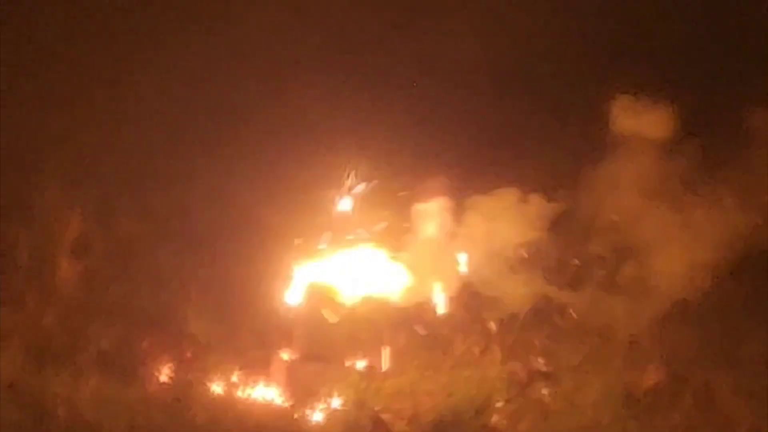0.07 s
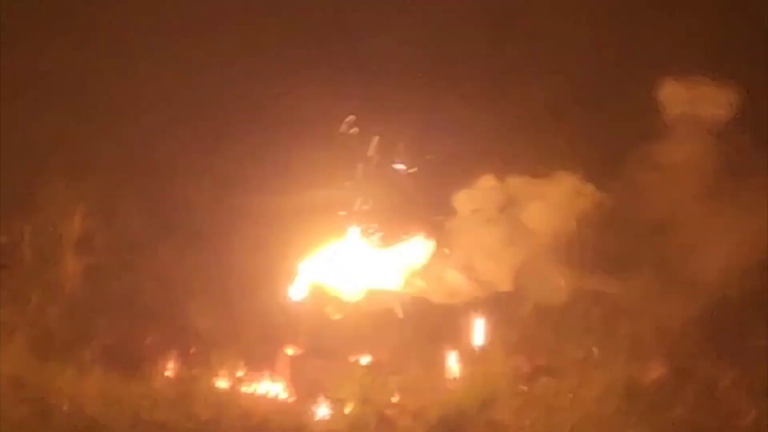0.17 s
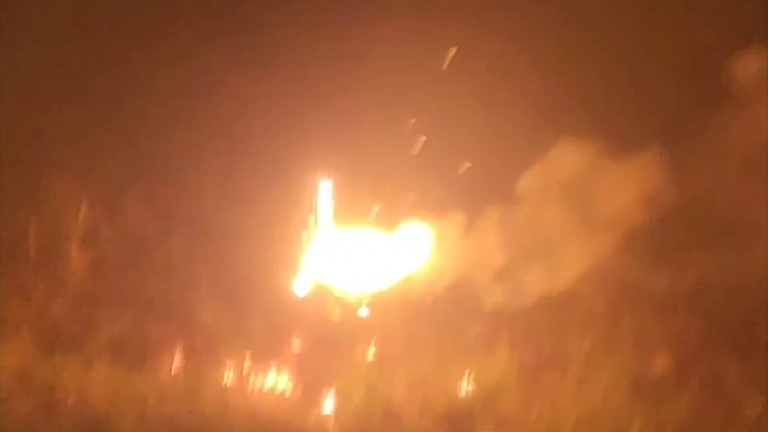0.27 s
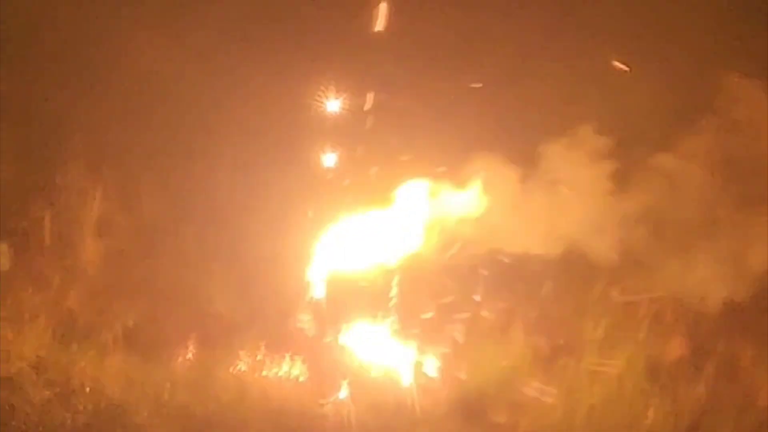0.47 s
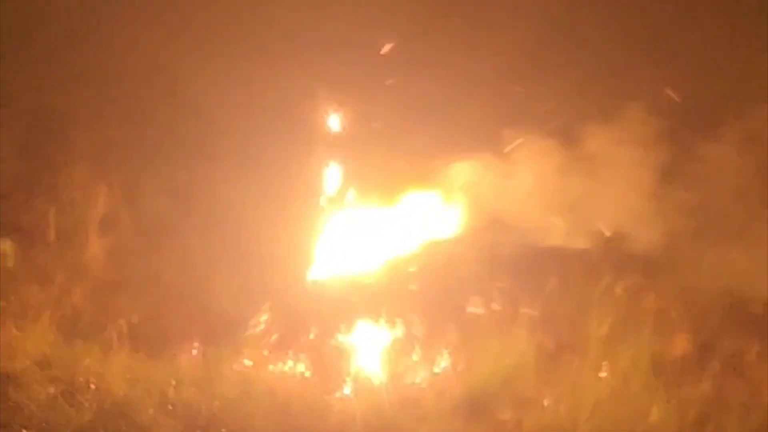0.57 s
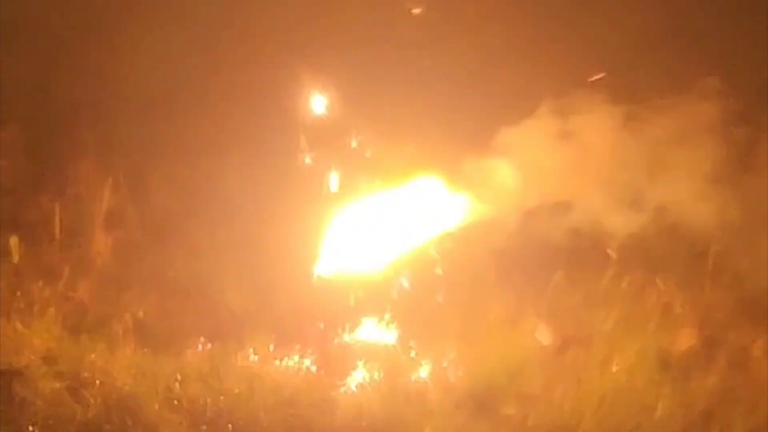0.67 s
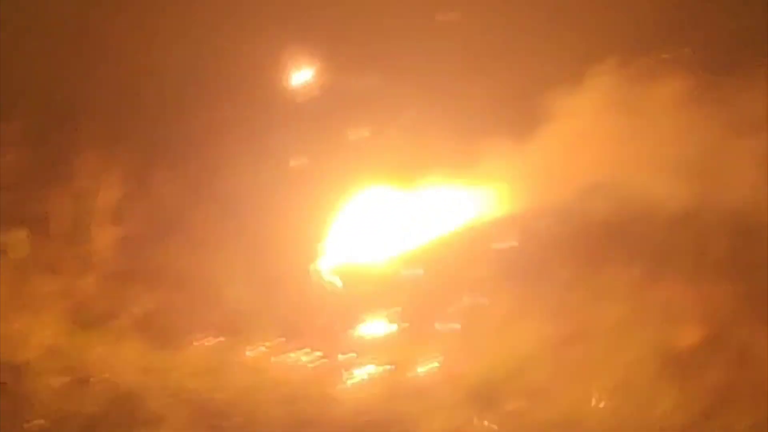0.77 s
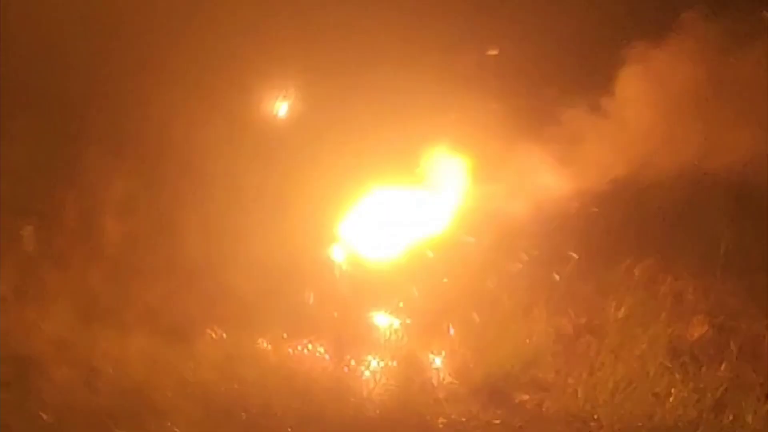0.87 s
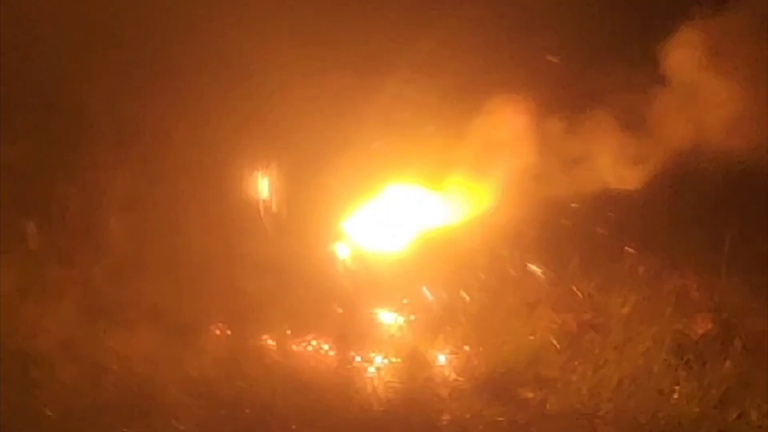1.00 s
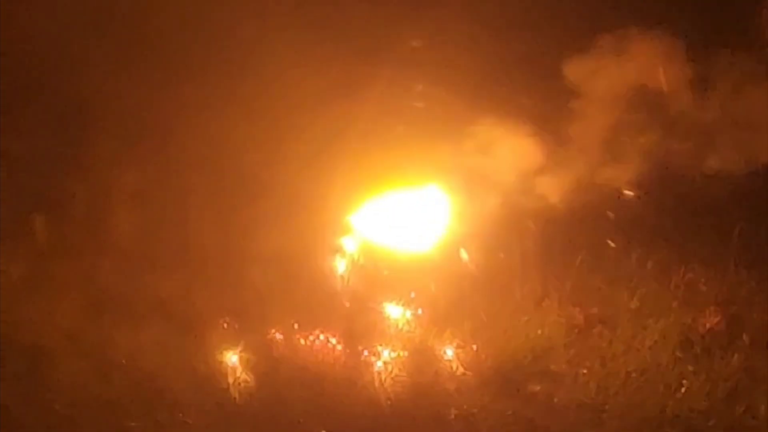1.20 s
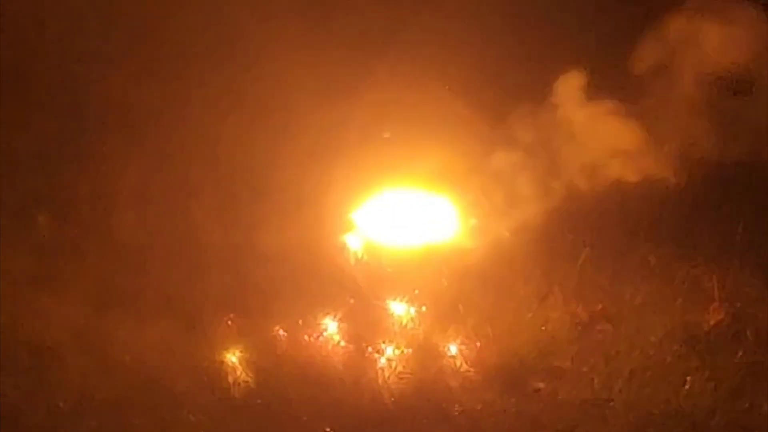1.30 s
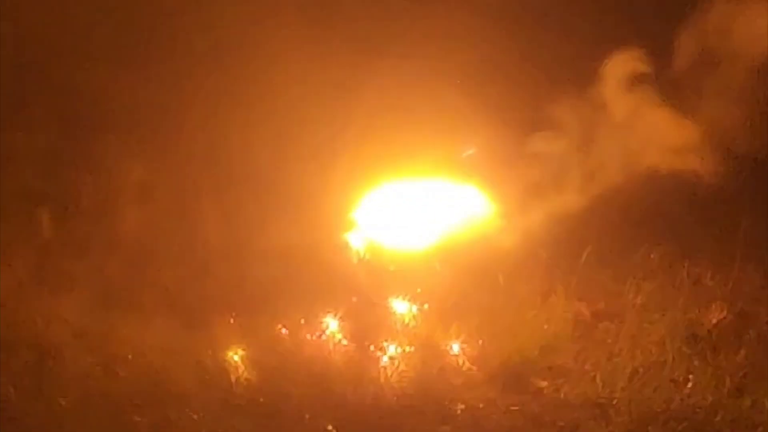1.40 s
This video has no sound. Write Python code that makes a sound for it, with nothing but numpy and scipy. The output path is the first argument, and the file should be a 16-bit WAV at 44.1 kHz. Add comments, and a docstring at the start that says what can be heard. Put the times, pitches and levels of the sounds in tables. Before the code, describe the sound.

A surging hiss and roar of burning thermite, outdoors a few metres off, with low rumble and faint crackle. A small pop comes, then a loud thumping pop, then a sharper, weaker one, among brief spits and soft puffs.

```python
"""Open ground at night, with thermite burning a few metres away.
The jet of flame hisses and roars in surges over a fluttering rumble, while sparks crackle faintly.
The melt spits, and three gas pockets pop out of it, the middle one much the loudest.
Soft puffs of gas thump around them. Grass and bushes scatter the pops and spits back."""
import sys
import numpy as np
from scipy import signal
from scipy.io import wavfile
from scipy.ndimage import uniform_filter1d

SR = 44100
rng = np.random.default_rng(int(sys.argv[2]) if len(sys.argv) > 2 else 0)


def generate_wav(signal):
    """Clip the signal to [-1, 1] and save it as 16-bit WAV at the path in sys.argv[1]."""
    frames = np.transpose(np.atleast_2d(signal))
    scaled = np.clip(frames, -1, 1) * 32767
    pcm = np.round(scaled).astype(np.int16)
    wavfile.write(sys.argv[1], SR, pcm)


N = 63945

# how strongly the thermite burns (time [s], relative level [dB])
BURN_STRENGTH = [(0, -66.5), (0.12, -63.5), (0.19, -67), (0.235, -65), (0.37, -66.5), (0.426, -64.5),
                 (0.49, -67.5), (0.55, -63.9), (0.62, -65.5), (0.7, -66.6), (0.753, -61), (0.87, -63),
                 (0.94, -63.5), (0.97, -61), (1.07, -67.5), (1.2, -67.5), (1.3, -68.7), (1.45, -67)]
# tone of the hiss and the sparks (frequency [Hz], relative level [dB])
HISS_TONE = [(500, -29), (1300, -2), (2400, 6), (3500, 4.5), (5300, -3.5), (7400, -2.5), (9500, -16.5),
             (12000, -27.5), (16000, -38)]


def amp(db):
    """Turns decibels into a gain."""
    return 10 ** (np.asarray(db) / 20)


def unit(x):
    """Scales a signal to an average power of 1."""
    return x / np.sqrt(np.mean(x ** 2) + 1e-20)


def read(points, hz):
    """Looks up a table by frequency, on a log scale."""
    f, value = np.transpose(points)
    return np.interp(np.log(hz + 1), np.log(f + 1), value)


def swing(curve, t):
    """How many dB a level curve lies above the average of its points."""
    s, db = np.transpose(curve)
    return np.interp(t, s, db - db.mean())


def pan(db):
    """Left and right gains; positive dB makes the left louder."""
    return amp(np.array([[db], [-db]]) / 2)


def add(mix, start_s, sound):
    """Mixes a sound in at a given time."""
    part = mix[:, max(round(start_s * SR), 0):][:, :sound.shape[-1]]
    part += sound[..., :part.shape[1]]


def impulse(tone, size=4096):
    """A click with the given tone, also usable as a filter."""
    log_gain = np.log(amp(read(tone, abs(np.fft.fftfreq(size, 1 / SR)))))
    spectrum = np.exp(np.conj(signal.hilbert(log_gain)))  # packs the energy at the start
    return np.fft.ifft(spectrum).real[:size // 2]


def convolve(x, response):
    """Filters each channel and keeps its length."""
    return signal.fftconvolve(np.atleast_2d(x), np.atleast_2d(response), axes=1)[:, :x.shape[-1]]


def turbulence(tone, curve, patchy_db, flicker_db, size):
    """Swirling gas: stereo noise that follows a level curve, with random patches and flicker."""
    # how alike the two sides are (frequency [Hz], likeness [-1 to 1])
    likeness = [(60, 0.97), (130, 0.85), (300, 0.75), (650, 0.76), (1400, -0.45), (2500, 0.18),
                (16000, .05)]
    hop = size // 4
    t = np.arange(N // hop + 6) * hop / SR
    hz = np.fft.rfftfreq(size, 1 / SR)
    a, b, c, d, patches = rng.standard_normal((5, len(t), len(hz)))
    patches = uniform_filter1d(patches, size=10, axis=0)  # smooth over time
    patches = unit(uniform_filter1d(patches, size=7, axis=1))  # and over frequency
    flicker = unit(uniform_filter1d(rng.standard_normal(len(t)), size=3))[:, None]
    same = np.clip(read(likeness, hz), -1, 1)
    left = a + 1j * b
    right = same * left + np.sqrt(1 - same ** 2) * (c + 1j * d)
    level_db = read(tone, hz) + swing(curve, t)[:, None] + patchy_db * patches + flicker_db * flicker
    spectra = np.array([left, right]) * amp(level_db)
    _, noise = signal.istft(spectra.transpose(0, 2, 1), nperseg=size, noverlap=size - hop)
    return unit(noise[:, :N])


def scatter(sound):
    """The ground, grass and bushes throw back a short, blurred echo."""
    # how long the echo lasts (frequency [Hz], time to fade by 60 dB [s])
    fade_times = [(100, 0.12), (600, 0.093), (2000, 0.073), (10000, 0.12)]
    hz, t, noise = signal.stft(rng.standard_normal((2, SR // 2)), SR, nperseg=256)
    fade = amp(-60 * t / read(fade_times, hz)[:, None])
    _, tail = signal.istft(noise * fade, SR, nperseg=256)
    return amp(-13) * convolve(sound, tail / np.linalg.norm(tail[0]))


def rumble():
    """Flame and wind make a low flutter."""
    # tone of the rumble (frequency [Hz], relative level [dB])
    tone = [(15, -8), (30, -18), (55, 3.5), (85, 1.5), (125, -6), (180, -12.5), (260, -16.5), (450, -30.5),
            (1200, -97)]
    # its rise and fall (time [s], relative level [dB])
    flutter = [(0, -44), (0.099, -45.5), (0.27, -40), (0.33, -45), (0.48, -45.5), (0.6, -42.5), (0.72, -46),
               (0.84, -46), (0.928, -43), (1.07, -49.5), (1.14, -44), (1.22, -50.5), (1.45, -44)]
    return amp(-42.5) * turbulence(tone, flutter, patchy_db=0.03, flicker_db=0, size=2048)


def sparks(usual_per_s=260, spread_db=4):
    """Sparks make tiny ticks of random size, more of them while the burn is strong."""
    per_s = usual_per_s * amp(swing(BURN_STRENGTH, np.arange(N) / SR))
    ticks = (rng.random(N) < per_s / SR) * rng.choice([-1, 1], N)
    sizes = amp(spread_db * np.minimum(rng.exponential(1, N), 4))
    sides = rng.uniform(0.24, 1, (2, N))
    return amp(-80) * unit(convolve(ticks * sizes * sides, impulse(HISS_TONE)))


def puffs(width_cycles=0.38):
    """Each puff of gas is one rounded swell of pressure with a dip on either side."""
    # soft puffs (time [s], level [dB], pitch [Hz], left over right [dB])
    gas_puffs = [(0.232, -42, 123, -29), (0.254, -35.5, 80.5, -7), (0.278, -33.5, 101, -15),
                 (.289, -38.5, 134, -23), (0.4427, -31, 149, -14), (.634, -43, 161, -26.5),
                 (.679, -30, 114, -5), (0.69, -34, 119, -2), (.932, -35.5, 70, -28.5),
                 (0.99, -38.5, 130, 5)]
    out = np.zeros((2, N))
    for s, db, hz, pan_db in gas_puffs:
        cycles = (np.arange(N) / SR - s) * hz
        swell = np.exp(-0.5 * (cycles / width_cycles) ** 2)
        out += amp(db) * pan(pan_db) * swell * np.cos(2 * np.pi * cycles)
    return out


def flame():
    """The jet of flame surges with a fine fizz, a hiss and a roar; the fizz swings widest."""
    # tones of the fizz and the roar (frequency [Hz], relative level [dB])
    fizz_tone = [(3000, -18), (6000, 0.5), (8000, -1.5), (11500, -4.5), (16000, -4)]
    roar_tone = [(80, -2), (200, 2), (330, -3), (520, 0), (800, -4), (1100, -9.5), (1700, -12), (2300, -18),
                 (5000, -39.5)]
    # their surges (time [s], relative level [dB])
    fizz_surges = [(0, -85), (0.12, -78.5), (0.19, -87), (0.235, -83), (0.37, -82), (0.41, -75),
                   (0.44, -73.5), (0.49, -95), (0.55, -76.5), (0.61, -82.5), (0.7, -87), (0.755, -75),
                   (0.87, -78), (0.97, -71.5), (1.079, -89.5), (1.45, -90)]
    roar_surges = [(0, -56), (0.12, -53.0), (0.36, -55.5), (0.43, -51), (0.49, -54), (0.65, -55.5),
                   (0.84, -54.5), (0.961, -50.5), (1.08, -56), (1.22, -58), (1.45, -56.5)]
    fizz = turbulence(fizz_tone, fizz_surges, patchy_db=1.4, flicker_db=1, size=256)
    hiss = turbulence(HISS_TONE, BURN_STRENGTH, patchy_db=0.9, flicker_db=0.85, size=256)
    roar = turbulence(roar_tone, roar_surges, patchy_db=1.5, flicker_db=0.28, size=512)
    return amp(-66.5) * fizz + amp(-62) * hiss + amp(-53.5) * roar


def crack(tilt_db, rise_s=0.0006, fade_s=0.0022):
    """A click inside a quick spray of spatter; more tilt (dB per octave) makes it brighter."""
    # tone of the crack before tilting (frequency [Hz], relative level [dB])
    tone = [(100, -25), (500, 5.5), (1050, 2.5), (2100, 4.5), (3500, -0.5), (4500, -10), (6500, -9.5),
            (12000, -13), (16000, -12)]
    t = np.arange(SR // 2) / SR
    snap = impulse([(hz, db + tilt_db * np.log2(hz / 1000)) for hz, db in tone])
    click = 0.5 * (t == 0)
    spray = (1 - np.exp(-t / rise_s)) * np.exp(-t / fade_s) * rng.standard_normal((2, len(t)))
    return convolve(click + 0.16 * spray, snap / abs(snap).max())


def pop(thump_db, low_cut_hz, pan_db, lag_s, knock_db, ring_db, crack_db, tilt_db, crack_pan_db):
    """A gas pocket bursts with a thump, a hollow knock, a brief ring and a crack."""
    # tone of the thump (frequency [Hz], relative level [dB])
    thump_tone = [(100, 9.5), (160, 5.5), (300, -4), (550, -12), (800, -17.5), (1450, -20.5), (2300, -52),
                  (5000, -75), (16000, -100)]
    # notes the pop sets ringing (pitch [Hz], relative level [dB], time to fade by 60 dB [s])
    ring_notes = [(144.3, -21, 0.18), (295.7, -26.5, 0.2), (535, -19.5, 0.055), (736, -29.5, 0.115),
                  (908, -7, 0.027), (1037, -16, 0.03), (1522, -29.5, 0.13), (1960, -38.5, 0.044),
                  (2550, -44, 0.046)]
    rebound_s, knock_hz, knock_peak_s = 0.00207, 459, 0.0011
    t = np.arange(SR // 2) / SR
    push = np.zeros(len(t))
    push[0] = -1
    push[round(rebound_s * SR)] = 0.12  # a weaker suck follows the push of gas
    low_cut = signal.butter(2, low_cut_hz, "high", fs=SR, output="sos")
    thump = signal.sosfilt(low_cut, convolve(push, impulse(thump_tone))[0])
    thump /= abs(thump).max()
    knock = t / knock_peak_s * np.exp(1 - t / knock_peak_s) * np.sin(2 * np.pi * knock_hz * t)
    ring = sum(amp(db - 60 * t / fade_s) * np.sin(2 * np.pi * hz * t) for hz, db, fade_s in ring_notes)
    left, right = pan(pan_db) * (amp(thump_db) * thump - amp(knock_db) * knock) - amp(ring_db) * ring
    late_right = np.interp(t - lag_s, t, right, left=0)
    return np.array([left, late_right]) + amp(crack_db) * pan(crack_pan_db) * crack(tilt_db)


def melt():
    """The melt gives off three pops and a few sharper spits."""
    # bursting gas pockets (time [s], thump [dB], thump's low cut [Hz],
    # thump and knock left over right [dB], right side's delay [s], knock [dB], ring [dB],
    # crack [dB], crack's tilt [dB per octave], crack left over right [dB])
    pops = [(0.4158, -29.5, 87.5, -15, 0.00029, -43.5, -33, -28.5, -2, -4),
            (.5263, -11.5, 111, 1.5, 0.00035, -25.5, -10.5, -20, -4.5, 7.5),
            (0.9175, -28, 62, -12, 0.00031, -31.5, -37, -19.5, -1, -4.5)]
    # sharp spits (time [s], level [dB])
    spits = [(0.2398, -42.5), (.401, -50), (0.441, -36), (.576, -56)]
    out = np.zeros((2, N))
    for s, *settings in pops:
        add(out, s, pop(*settings))
    for s, db in spits:
        add(out, s, amp(db) * crack(tilt_db=5))
    return out


def scene():
    """Flame, rumble, sparks and puffs, plus the melt's bursts and their echo."""
    bursts = melt()
    return flame() + rumble() + sparks() + puffs() + bursts + scatter(bursts)


def record(dry, cutoff_hz=15950):
    """The microphone's two openings each colour the sound, then the highest treble is cut."""
    # tone of each opening (frequency [Hz], gain [dB])
    left_tone = [(1000, 0), (3000, -1.5), (5500, 5), (6300, 1), (7400, 2), (8300, -9), (9600, -23),
                 (11500, -7.5), (16000, -5.5)]
    right_tone = [(1000, -1), (1750, 1.5), (2400, -13), (3300, -11.5), (5300, -5.5), (6400, -17.5),
                  (7800, -2.5), (9600, -13), (11500, -3.5), (16000, -6.5)]
    coloured = convolve(dry, np.array([impulse(left_tone), impulse(right_tone)]))
    low_pass = signal.firwin(511, cutoff_hz, window=("kaiser", 9), fs=SR)
    return signal.oaconvolve(coloured, low_pass[None], "same", axes=1)


dry = scene()
out = record(dry)
generate_wav(out)
```